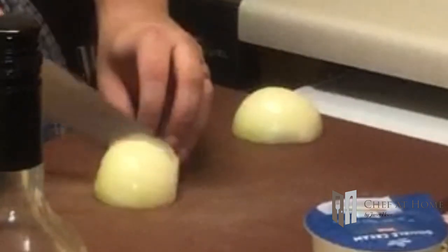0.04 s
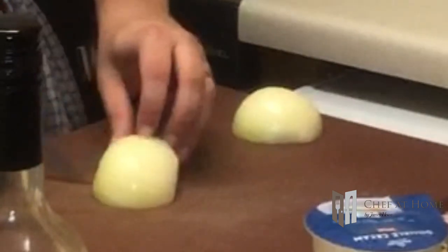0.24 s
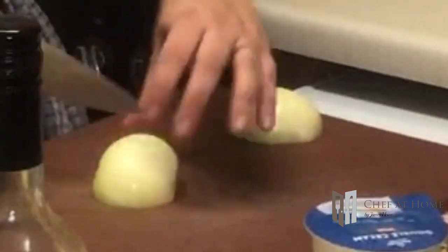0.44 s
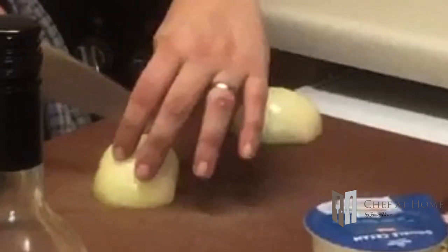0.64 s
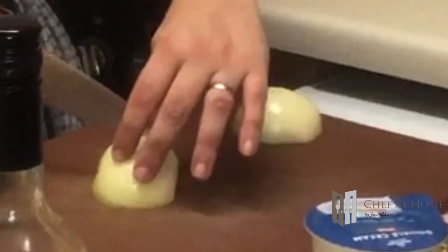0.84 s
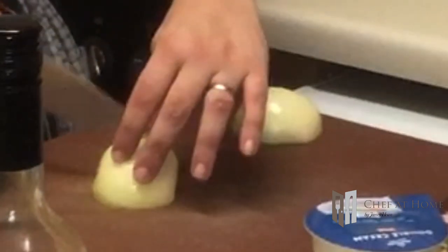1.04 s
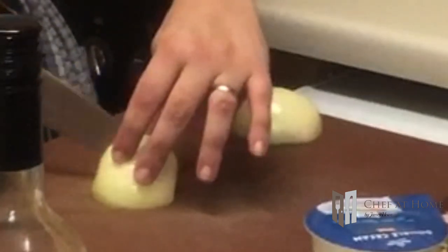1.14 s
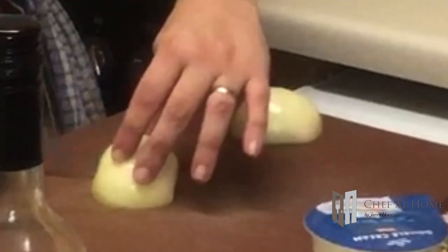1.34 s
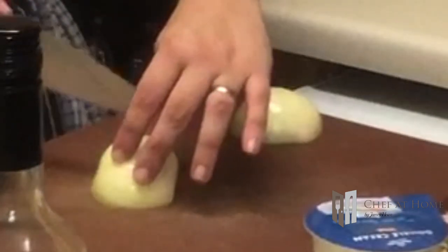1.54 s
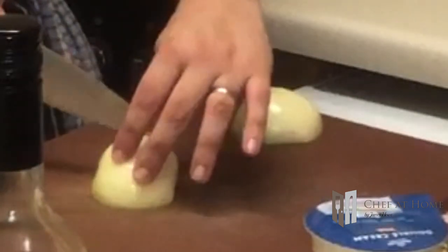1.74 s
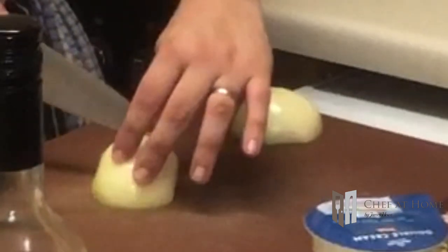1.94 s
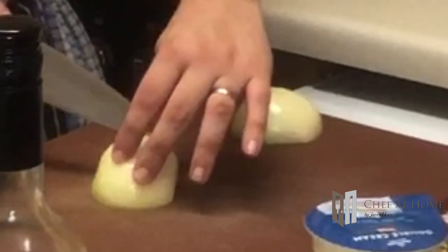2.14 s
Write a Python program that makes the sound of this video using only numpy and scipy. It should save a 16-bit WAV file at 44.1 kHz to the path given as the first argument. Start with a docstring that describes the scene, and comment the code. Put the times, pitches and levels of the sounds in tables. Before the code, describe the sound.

A knife cuts through an onion on a chopping board. A wet, crisp crunch starts almost at once and ends in a loud woody knock at 0.2 seconds; a second crunch at 1.07 leads to a slightly softer knock at 1.25. Knocks ring briefly in the small room and overload the close microphone. Very faint blade brushes come around 1.9 and 2.15, over low hum and faint whine.

```python
"""Two knife cuts through an onion

In a small kitchen a knife slices twice through an onion on a wooden board: dense tiny bursts make a wet crunch.
Each time the blade then knocks on the board, whose decaying modes ring into the room and overload the microphone.
Steady hum tones, a faint appliance whine and filtered room noise lie underneath.
Later the blade is set on the onion again: soft brushes of noise with a faint ring of steel."""
import sys
import numpy as np
from scipy import signal
from scipy.io import wavfile

SR = 44100
rng = np.random.default_rng(int(sys.argv[2]) if len(sys.argv) > 2 else 0)


def waveform_to_disk(signal):
    """Save audio, clipped to [-1, 1], as 16-bit WAV at the path in sys.argv[1]."""
    frames = np.transpose(np.atleast_2d(signal))
    scaled = np.clip(frames, -1, 1) * 32767
    samples = np.round(scaled).astype(np.int16)
    wavfile.write(sys.argv[1], SR, samples)


def elevation(decibels):
    """Turn decibel levels (scalar or array-like) into linear amplitude ratios."""
    levels = np.asarray(decibels, float)
    return 10 ** (levels / 20)


N = 97020  # length [samples]

# mains hum and an appliance's low tones: (frequency [Hz], level [dB rms])
HUM_TONES = [(50, -34), (100.2, -62), (121, -63), (150, -50), (200, -68), (250, -61), (341, -66),
             (402, -70)]
# steady part of the appliance whine: (frequency [Hz], level [dB rms])
WHINE_TONES = [(4129, -81.5), (5459, -90.5), (6492, -97)]
# relative spectrum of the room noise: (frequency [Hz], density [dB per Hz])
AIR_SPECTRUM = [(60, 0.5), (100, -1), (200, -7), (400, -12), (800, -19.5), (1500, -29.5), (3000, -32),
                (5500, -43), (9000, -44.5), (16000, -59.5)]
# dying away of the room: (frequency [Hz], t60 [s])
ROOM_DECAY = [(100, 0.9), (300, 0.24), (1000, 0.2), (3000, 0.2), (6000, 0.31), (10000, 0.057), (15000, .12)]
# relative tone of the room's tail: (frequency [Hz], level [dB])
ROOM_TONE = [(300, -2), (600, -2), (1000, -4), (2000, 0), (2700, -0.5), (3400, -3.5), (5000, -3),
             (8000, -6), (15000, -4)]
# echoes from the nearest surfaces: (delay [s], level [dB])
NEAR_ECHOES = [(.0095, -5), (0.0166, -13), (.022, -10.5)]
# blade lightly touches onion and board: (time [s], starting brush level before dulling [dB rms],
# steel ring level [dB], dull share [0-1])
LIGHT_TOUCHES = [(1.885, -57, -82, .9), (1.942, -60, -70, .3), (1.950, -58, -76, .3), (2.158, -57, -90, .4)]
# relative spectrum of the touching brush: (frequency [Hz], density [dB per Hz])
BRUSH_SPECTRUM = [(300, 6), (1400, 9), (2000, 6), (5000, -6), (10000, -16.5), (15000, -34)]
# modes of the blade: (frequency [Hz], relative level [dB], t60 [s])
BLADE_MODES = [(1380, 6, .06), (1916, 5, .08), (5900, -2, .04), (9518, 2, .1), (13230, -1, .06)]
# effort of the blade going through the flesh, one list per slice: (time [s], level [dB])
SLICE_EFFORT = [
    [(0.034, -52), (0.037, -43), (0.068, -40.5), (0.094, -41), (0.102, -34.5), (0.128, -39), (0.145, -45),
     (0.155, -51), (0.185, -51.5)],
    [(1.0675, -57), (1.069, -35), (1.09, -47.5), (1.097, -36.5), (1.144, -37.5), (1.17, -44.5),
     (1.185, -57.5), (1.21, -70.5)],
]
# relative spectrum of the bursting cells: (frequency [Hz], density [dB per Hz])
FLESH_SPECTRUM = [(130, 1.5), (300, 4), (550, 9), (1000, -16), (2000, -8.5), (4500, -12), (7000, -23),
                  (10000, -23), (13000, -43), (16000, -47)]
# layers that give way audibly: (time [s], starting level [dB rms])
LAYER_SNAPS = [(0.036, -47), (0.07, -50), (0.1, -39), (0.199, -32.5), (0.207, -27), (1.069, -42),
               (1.098, -36), (1.124, -26.5), (1.142, -44.5)]
# faint noise heard just ahead of each knock: (start [s], level at start [dB], level at the knock [dB])
PRE_KNOCK_NOISE = [(0.186, -43, -38), (1.231, -38.5, -41)]
# modes of the board: (frequency [Hz], relative level [dB], t60 [s])
BOARD_MODES = [(556, -22.5, .12), (654.6, -14.5, 0.086), (747, -16.5, 0.14), (884, -25.5, 0.033),
               (956, -10.5, 0.15), (985.2, -5, 0.045), (1027, -11.5, 0.086), (1066, -10.5, .1),
               (1127, -3.5, 0.033), (1282, -5.5, 0.03), (1379, -12, 0.063), (1578, -17.5, 0.052),
               (1933, -19, .06), (2114, -24, 0.08), (2158, -22.5, 0.033), (2774, -25, .05),
               (2960, -18.5, .02)]
# low modes of the counter under the board: (frequency [Hz], relative level [dB], t60 [s])
COUNTER_MODES = [(160, -20, 0.16), (191, -29, 0.45), (236, -21, 0.25), (269.3, -15.5, 0.22),
                 (302.5, -9.5, 0.11), (369.3, -21.5, 0.39), (411.7, -25, 0.3), (422.5, -20.5, .2),
                 (496, -18.5, 0.12)]
# the blade lands on the board: (time [s], level [dB])
BOARD_KNOCKS = [(0.2101, -1), (1.2510, -3.5)]


def at_hz(points, hz):
    """Read a spectrum on a log-frequency axis."""
    table_hz, values = np.transpose(points)
    return np.interp(np.log(np.maximum(hz, 1)), np.log(table_hz), values)


def rms_one(x):
    """Scale to rms 1."""
    return x / np.sqrt(np.mean(x ** 2) + 1e-20)


def drift(rate):
    """Slow wander through random points of spread 1, with rate points a second."""
    points = rng.standard_normal(400)
    return np.interp(np.arange(N) / SR * rate, np.arange(400), points)


def clicks(s, db):
    """Single impulses at given times."""
    out = np.zeros(N)
    np.add.at(out, (np.asarray(s) * SR).astype(int), elevation(np.asarray(db)))
    return out


def puffs(s, db, decay_s):
    """Envelope that jumps up at each time and dies away exponentially."""
    return signal.lfilter([1], [1, -np.exp(-1 / (decay_s * SR))], clicks(s, db))


def level_curve(t, s, db):
    """Gain that runs straight in dB between points, practically silent outside them."""
    return elevation(np.interp(t, s, db, left=-200, right=-200))


def butter(x, order, hz, kind="low"):
    """Butterworth filter."""
    return signal.sosfilt(signal.butter(order, hz, kind, fs=SR, output="sos"), x)


def ring(x, hz, t60):
    """Resonator: a unit click sets a decaying sine of height 1 ringing."""
    r = elevation(-60 / (max(t60, 0.001) * SR))
    w = 2 * np.pi * hz / SR
    return signal.lfilter([0, np.sin(w)], [1, -2 * r * np.cos(w), r * r], x + 1e-18)


def bands(white):
    """Half-octave bands of two noises dealt in turn, with their centres."""
    for k, low in enumerate(40 * 2 ** np.arange(0, 9, 0.5)):
        high = min(low * np.sqrt(2), 0.45 * SR)
        yield np.sqrt(low * high), butter(white[k % 2], 2, [low, high], "band")


def background():
    """Wavering hum and whine sines, narrow noise around the whine, low rumble, gently patchy room noise."""
    t = np.arange(N) / SR
    hum = sum(elevation(db + 0.8 * drift(2.7)) * np.sin(2 * np.pi * hz * t) for hz, db in HUM_TONES)
    whine = np.zeros(N)
    for hz, db in WHINE_TONES:
        whine += elevation(db + 1.5 * drift(30.0)) * np.sin(2 * np.pi * hz * t)
        whine += elevation(db) * rms_one(ring(rng.standard_normal(N), hz, 0.015))  # blurs the tone
    settle = SR  # samples dropped while the filter settles
    rumble = butter(rng.standard_normal(N + settle), 4, 38)[settle:]
    settle = SR // 4
    air = sum(elevation(at_hz(AIR_SPECTRUM, hz) + 1.2 * drift(3.4)) * band[settle:]
              for hz, band in bands(rng.standard_normal((2, N + settle))))
    tones = np.sqrt(2) * (hum + whine)  # a sine of height sqrt(2) has rms 1
    return tones + elevation(-50) * rms_one(rumble) + elevation(-55) * rms_one(air)


def room(x):
    """A few early echoes, then noise that builds up fast and dies band by band."""
    late_db, late_t60_s = -23.5, 0.48  # slower tail of the adjoining space
    build_s, tail_db = 0.0041, -5.5
    t = np.arange(SR) / SR
    tail = np.zeros(SR)
    for hz, band in bands(rng.standard_normal((2, SR))):
        decay = elevation(-60 * t / at_hz(ROOM_DECAY, hz)) + elevation(late_db - 60 * t / late_t60_s)
        tail += elevation(at_hz(ROOM_TONE, hz)) * band * decay
    tail = butter(tail, 2, 450, "high") * (1 - np.exp(-t / build_s))
    tail = elevation(tail_db) * tail / np.sqrt(np.sum(tail ** 2))
    echoes = butter(clicks(*np.transpose(NEAR_ECHOES))[:SR], 2, [700, 1650], "band")
    return signal.fftconvolve(x, tail + echoes)[:N]


def touches():
    """Light contacts: a soft brush of noise, duller on flesh, and the blade's modes ring faintly."""
    decay_s, dull_hz = 0.0081, 3060
    s, db, steel_db, dull = np.transpose(LIGHT_TOUCHES)
    vary_db = 2 * rng.standard_normal((len(s), len(BLADE_MODES)))
    steel = sum(elevation(level) * ring(clicks(s, steel_db + vary_db[:, k]), hz, t60)
                for k, (hz, level, t60) in enumerate(BLADE_MODES))
    brush = rms_one(sum(elevation(at_hz(BRUSH_SPECTRUM, hz)) * band
                        for hz, band in bands(rng.standard_normal((2, N)))))
    muffled = butter(brush, 2, dull_hz)
    bright_puffs = puffs(s, db + 20 * np.log10(1 - dull), decay_s)
    dull_puffs = puffs(s, db + 20 * np.log10(dull), decay_s)
    return steel + brush * bright_puffs + muffled * dull_puffs


def board(x):
    """The board's modes driven by one force."""
    return sum(elevation(db) * ring(x, hz, t60) for hz, db, t60 in BOARD_MODES)


def counter(x):
    """The counter's low modes driven by one force; neighbours start in opposite directions."""
    return sum((-1) ** k * elevation(db) * ring(x, hz, t60) for k, (hz, db, t60) in enumerate(COUNTER_MODES))


def grain_level():
    """Level of the grains: slow slicing effort, sudden layer snaps and faint noise ahead of each knock."""
    t = np.arange(N) / SR
    level = sum(level_curve(t, *np.transpose(rows)) for rows in SLICE_EFFORT)
    level = level + puffs(*np.transpose(LAYER_SNAPS), 0.0021)
    for (start, first_db, last_db), (knock, _) in zip(PRE_KNOCK_NOISE, BOARD_KNOCKS):
        level = level + level_curve(t, [start, knock], [first_db, last_db])
    return level


def cell_ring(x, hz):
    """Two resonators in a row give each burst a soft onset and a few cycles of ringing."""
    t60 = 4.5 / hz  # 4.5 cycles
    return ring(ring(x, hz, t60), hz, t60)


def slicing():
    """Cells burst densely under the edge, each ringing briefly; the force also shakes the board."""
    cells_per_s, size_spread_db = 24000, 2.6
    shake_db, snap_board_db = -9, -6.5
    level = grain_level()
    sizes = elevation(size_spread_db * np.minimum(rng.exponential(1, N), 5)) * rng.choice([-1, 1], N)
    cells = rms_one(sizes * (rng.random(N) < cells_per_s / SR))
    pitches = np.geomspace(130, 15000, num=26)
    dealt = rng.integers(0, 26, N)  # which pitch each cell gets
    crunch, power = np.zeros(N), 0
    for k, hz in enumerate(pitches):
        own = cells * (dealt == k)
        weight = elevation(at_hz(FLESH_SPECTRUM, hz)) * np.sqrt(hz)  # bandwidth grows with pitch
        crunch += weight / np.std(cell_ring(own, hz)) * cell_ring(own * level, hz)
        power += weight ** 2
    crunch = crunch / np.sqrt(power)
    steady_shake = board(cells) + counter(cells)  # sets the level
    shake = board(cells * level) + counter(cells * level)
    shake = elevation(shake_db) * shake / np.std(steady_shake)
    s, db = np.transpose(LAYER_SNAPS)
    return crunch + shake + board(clicks(s, db + snap_board_db))


def knocks():
    """Each landing is a short push into the modes of board and counter plus a bright crack of edge on wood."""
    contact_hz = 3550  # softness of the contact
    crack_db, crack_s = -23, 0.0049
    s, db = np.transpose(BOARD_KNOCKS)
    vary_db = rng.standard_normal((len(s), len(BOARD_MODES)))  # spread 1 dB
    push = sum(elevation(level) * ring(clicks(s, db + vary_db[:, k]), hz, t60)
               for k, (hz, level, t60) in enumerate(BOARD_MODES))
    push = butter(push + counter(clicks(s, db)), 2, contact_hz)
    crack = rng.standard_normal(2000) * np.exp(-np.arange(2000) / (SR * crack_s))
    crack = butter(butter(crack, 2, 2500, "high"), 1, 5400)
    return -push + signal.fftconvolve(clicks(s, db + crack_db), crack)[:N]


def scene():
    """Knife and board heard directly and through the room, over the kitchen's background."""
    near = knocks() + slicing() + touches()
    return (near + room(near) + background())[None]


def low_pass(x):
    """Removes everything above the highest recorded frequency."""
    return signal.sosfilt(signal.butter(12, 16500, fs=SR, output="sos"), x)


def record(dry):
    """The overloaded microphone flattens peaks towards a ceiling, leaving quiet sound untouched."""
    ceiling, knee = 0.7, 8.0  # full scale is 1; a higher knee bends more abruptly
    x = dry / ceiling
    mix = ceiling * x / (1 + np.abs(x) ** knee) ** (1 / knee)
    return low_pass(mix)


dry = scene()
out = record(dry)
waveform_to_disk(out)
```